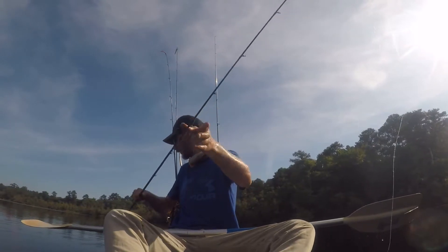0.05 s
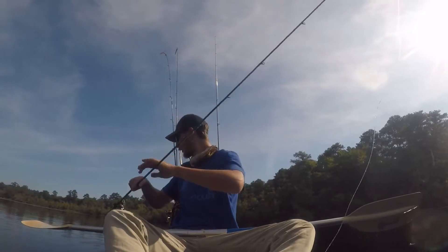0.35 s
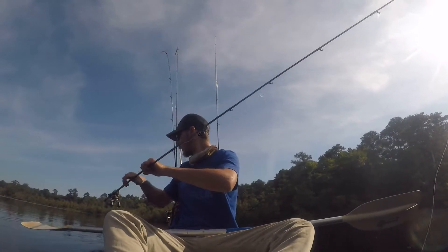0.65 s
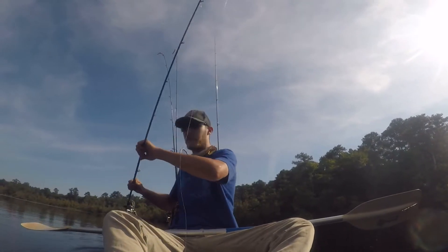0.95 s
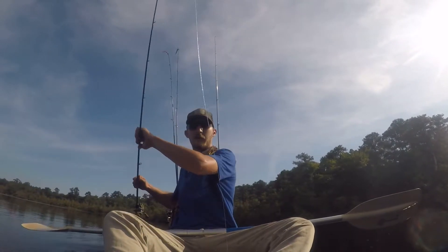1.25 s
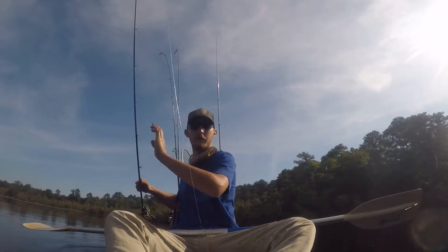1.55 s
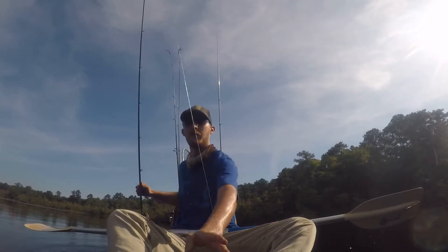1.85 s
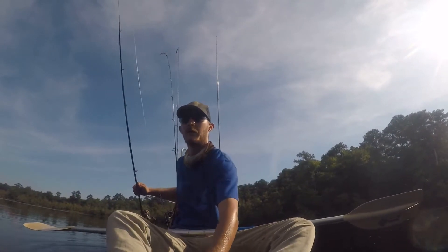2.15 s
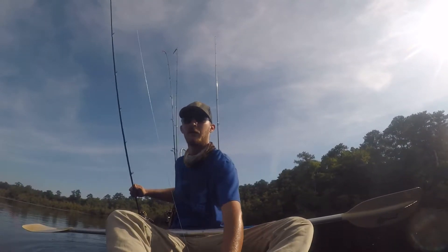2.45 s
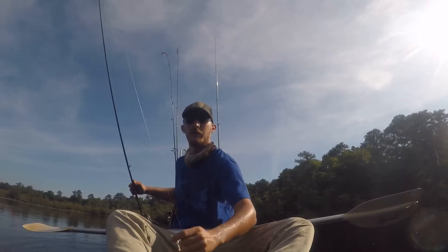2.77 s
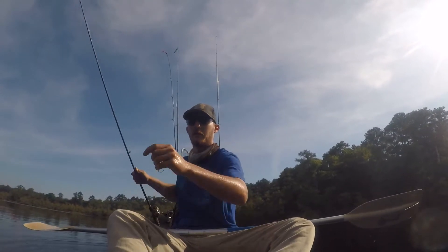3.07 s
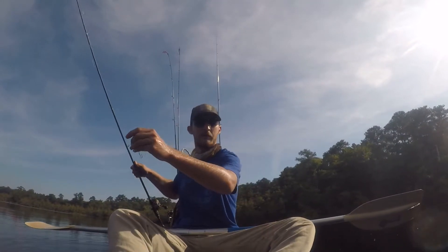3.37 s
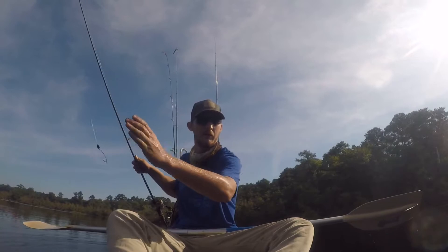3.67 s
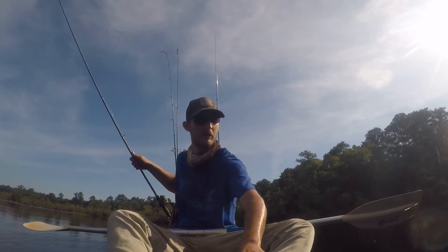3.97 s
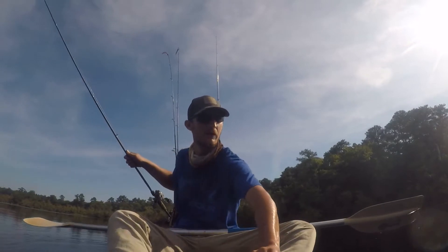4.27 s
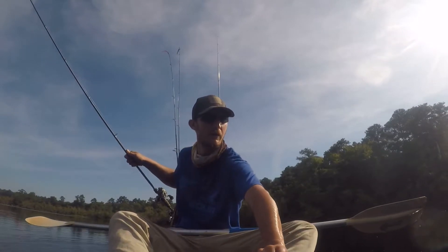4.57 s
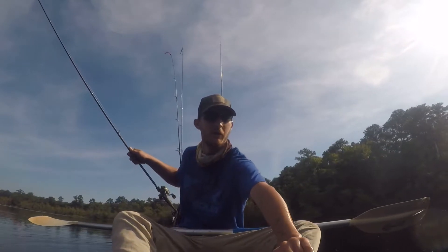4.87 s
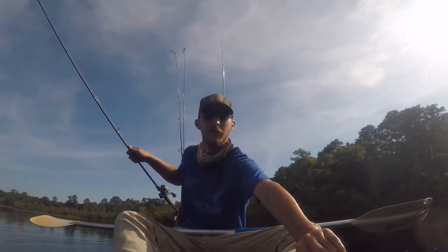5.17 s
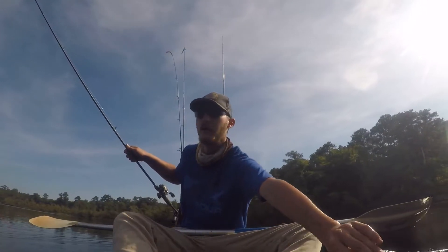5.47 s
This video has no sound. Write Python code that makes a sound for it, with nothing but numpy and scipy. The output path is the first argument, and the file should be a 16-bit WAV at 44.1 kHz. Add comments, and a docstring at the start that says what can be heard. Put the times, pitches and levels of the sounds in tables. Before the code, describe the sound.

Hollow knocks, rubbing and low thumps on a plastic kayak as fishing tackle is handled, over a faint pond hiss.

```python
"""Hollow knocks, rubbing and groans of a plastic kayak as an angler shifts about and handles rod and tackle.
Blows and stick-slip drive the hull's modes, which radiate into the air and shake the two microphones of
a camera fixed to the boat against each other. Weight shifts rock the boat; a sleeve brushes the rod.
Behind lie a calm pond's breeze rumble, soft hiss, thin insect band, small drips and faint chirps.
The camera's limiter ducks everything under the heaviest blows."""
import sys
import numpy as np
from scipy import signal
from scipy.fft import rfft, irfft
from scipy.io import wavfile
from scipy.ndimage import uniform_filter1d, minimum_filter1d

SR = 44100
rng = np.random.default_rng(int(sys.argv[2]) if len(sys.argv) > 2 else 0)


def bounce(signal):
    """Save signal as a 16-bit WAV file at the path given by the first command-line argument."""
    frames = np.transpose(np.atleast_2d(signal))
    limited = np.clip(frames, -1, 1)
    pcm = np.round(limited * 32767).astype(np.int16)
    wavfile.write(sys.argv[1], SR, pcm)


N = 248072
TIME = np.arange(N) / SR


def undb(db):
    """Decibels to gain."""
    return 10 ** (np.asarray(db) / 20)


def curve(table):
    """Linear interpolation of (time, value) rows."""
    return np.interp(TIME, *np.transpose(table))


def unit(x):
    """Scale to rms 1."""
    return x / np.sqrt(np.mean(x ** 2))


def running_rms(x, size):
    """Rms over a window of size samples."""
    return np.sqrt(np.abs(uniform_filter1d(x ** 2, size)) + 1e-18)


def band(x, lo_hz, hi_hz, order=2):
    """Butterworth band-pass."""
    return signal.sosfilt(signal.butter(order, [lo_hz, hi_hz], "band", fs=SR, output="sos"), x)


def walk(rate_hz):
    """Smooth random drift, rms 1."""
    size = int(SR / rate_hz)
    steps = np.repeat(rng.standard_normal(N // size + 1), size)
    return unit(uniform_filter1d(steps, size)[:N])


def impulses(per_s, spread_db, cap_spreads):
    """Random impulses of uneven size."""
    train = (rng.random(N) < per_s / SR) * rng.standard_normal(N)
    return train * undb(spread_db * np.minimum(rng.exponential(size=N), cap_spreads))


def ring(x, modes):
    """Drive parallel damped modes."""
    return sum(undb(db) * signal.lfilter(*signal.iirpeak(hz, hz / width_hz, fs=SR), x)
               for hz, width_hz, db in modes)


def add(out, start_s, x):
    """Mix x into out from start_s on."""
    start = max(int(start_s * SR), 0)
    out[start:start + len(x)] += x[:N - start]


def gesture(events, attack_s, release_s):
    """Envelope of movements that rise, hold and decay, summed in power."""
    power = np.zeros(N)
    for start_s, length_s, db in events:
        first = max(int(start_s * SR), 0)
        t = TIME[first:first + SR] - start_s
        rise = np.clip(t / attack_s, 0, 1)
        decay = np.exp(-np.maximum(t - length_s, 0) / release_s)
        power[first:first + SR] += (undb(db) * rise * decay) ** 2
    return np.sqrt(power)


def whistles(events, waver):
    """Thin, unsteady gliding tones that start abruptly, swell and fade."""
    out, unsteady = np.zeros(N), 1 + waver * walk(900)
    for start_s, start_hz, end_hz, length_s, db in events:
        count = int(length_s * SR)
        hz = np.geomspace(start_hz, end_hz, count) * np.roll(unsteady, -int(start_s * SR))[:count]
        swell = np.interp(np.linspace(0, 1, count), [0, 0.2, 0.6, 1], [0.44, 0.66, 0.75, 0.27])
        add(out, start_s, undb(db) * swell * np.sin(2 * np.pi * np.cumsum(hz) / SR))
    return out


def shake(x, pan_db, lag_s):
    """Vibration pushes the two microphones in opposite directions, the right one later."""
    return np.array([x * undb(pan_db / 2), -np.interp(TIME - lag_s, TIME, x) * undb(-pan_db / 2)])


def pond():
    """Open-air hiss, wider in the treble, with distant insects and the rumble of a light breeze."""
    # open-air spectrum: (frequency [Hz], relative density [dB])
    spectrum = [(25, -27), (70, -19), (102, -25), (120, 5), (150, -9.5), (300, -14.5), (500, -23),
                (1000, -31), (2000, -36), (4000, -42), (6000, -41), (10000, -43), (12000, -49.5),
                (15000, -58.5)]
    # envelopes, each: (time [s], level [dB])
    hiss_levels = [(0, -43), (.6, -44), (2.2, -43.5), (3.8, -43), (5.6, -40.5)]
    insect_levels = [(0, -60.5), (1.0, -66), (1.6, -101), (5.63, -64.5)]
    breeze_levels = [(0, -27.5), (.15, -37), (1.15, -42), (1.5, -51), (2.2, -55), (2.8, -43.5),
                     (4.7, -38.5), (5.6, -38.5)]
    hz = np.maximum(np.arange(N // 2 + 1) * SR / N, 1)
    points_hz, points_db = np.transpose(spectrum)
    colour = undb(np.interp(np.log(hz), np.log(points_hz), points_db))
    mid, side = (rfft(rng.standard_normal(N)) * colour for _ in range(2))
    width = 0.012 + 0.82 * hz ** 2 / (hz ** 2 + 2800 ** 2)
    air = unit(np.array([irfft(mid + width * side, N), irfft(mid - width * side, N)]))
    buzz = band(rng.standard_normal(N), 2282, 2512)
    insects = buzz / running_rms(buzz, 1500) * undb(curve(insect_levels) + 2.0 * walk(42))
    breeze = unit(band(rng.standard_normal(N), 32.3, 99)) * undb(curve(breeze_levels))
    return air * undb(curve(hiss_levels) + 0.83 * walk(7.7)) + insects + breeze


def chirps():
    """Far-off, mostly falling calls from one side, with an echo off the wooded shore."""
    # calls: (time [s], start pitch [Hz], end pitch [Hz], length [s], level [dB])
    glides = [(0.42, 2580, 2750, .05, -66), (.572, 2730, 2620, 0.039, -61.5),
              (0.939, 4620, 3800, 0.03, -57.5), (1.062, 4750, 3970, .034, -61),
              (1.185, 4700, 3800, 0.032, -62), (2.44, 4500, 3600, 0.045, -62),
              (2.548, 4670, 3650, .046, -68), (2.672, 4500, 3700, 0.042, -67),
              (3.663, 4400, 3520, 0.04, -61), (3.805, 4300, 3300, 0.028, -61),
              (4.685, 2040, 1420, 0.077, -58), (4.805, 4730, 3450, 0.046, -58.5),
              (4.927, 4820, 3150, 0.043, -52.5), (5.045, 4800, 4050, 0.023, -52),
              (5.525, 2130, 1400, 0.099, -54.5)]
    flutter_db, shore_decay_s, lag_s = 4, 0.025, 0.00005
    calls = whistles(glides, waver=0.012) * undb(flutter_db * walk(220))
    shore = rng.standard_normal(8192) * np.exp(-TIME[:8192] / shore_decay_s)
    direct = np.array([calls, np.interp(TIME - lag_s, TIME, calls)])
    echo = signal.fftconvolve(calls, shore / np.linalg.norm(shore))[:N]
    return undb(0.5) * direct + undb(-2.5) * echo


def drips():
    """Each drop beside the boat leaves a small bubble that rises in pitch."""
    # bubbles: (time [s], start pitch [Hz], length [s], level [dB])
    bubbles = [(.044, 1410, 0.021, -61), (0.06, 1810, 0.015, -49), (.093, 1670, 0.014, -55),
               (0.145, 1270, 0.0092, -43.5), (.155, 4000, .006, -52), (.187, 4430, 0.0073, -53),
               (.271, 5230, 0.0051, -49), (.351, 5200, .004, -53), (.396, 7400, .006, -53),
               (0.407, 1060, .012, -50), (0.551, 5000, 0.0046, -50.5), (0.558, 970, .012, -58),
               (0.67, 5200, 0.0046, -52)]
    glides = [(start_s, hz, hz * 1.055, length_s, db) for start_s, hz, length_s, db in bubbles]
    return whistles(glides, waver=0.041)


def sleeve():
    """Cloth and skin rub dully and crackle in fine grains, heard through the air."""
    # strokes along the rod: (time [s], length [s], dull rub [dB], crackle [dB])
    brushes = [(-.02, 0.062, -51, -52), (0.862, 0.045, -38.5, -57.5), (1.046, 0.028, -39.5, -53.5),
               (1.128, 0.063, -46, -61.5), (5.015, 0.18, -39, -54.5)]
    grains = impulses(per_s=2500, spread_db=3.7, cap_spreads=4)
    rub = band(grains, 216, 525)
    crackle = band(grains, 1220, 1940) + undb(-13.5) * band(grains, 3300, 6900)
    out = np.zeros(N)
    for k, part in enumerate([rub, crackle]):
        strokes = [(start_s, length_s, dbs[k]) for start_s, length_s, *dbs in brushes]
        out += unit(part) * gesture(strokes, attack_s=0.0077, release_s=0.06)
    return out


def wobble():
    """Weight shifts stir the boat's lowest mode, which sways the camera and pushes water aside."""
    # weight shifts: (time [s], level [dB])
    shifts = [(2.24, -37), (2.44, -35), (2.749, -18.5), (2.879, -18.5), (3.25, -35), (3.415, -17.5),
              (3.67, -28), (3.946, -9.5), (4.087, -10), (4.269, -22), (4.469, -14.5), (4.811, -11),
              (4.975, -3), (5.111, -8), (5.191, -9)]
    mode_hz, hold_s, rest_db, slosh_db = 47.43, 0.024, -35.5, -14
    stir = gesture([(start_s, hold_s, db) for start_s, db in shifts], attack_s=0.021, release_s=0.11)
    hz = mode_hz * (1 + 0.154 * walk(35))
    rocking = np.sin(2 * np.pi * np.cumsum(hz) / SR) * undb(2.15 * walk(28))
    rest = undb(rest_db) * np.clip((TIME - shifts[0][0]) / 0.18, 0, 1)  # persists once stirred
    sway = unit(band(rocking, 30.3, 66.7)) * np.hypot(stir, rest)
    slosh = unit(band(rng.standard_normal(N), 31.5, 69)) * stir * undb(slosh_db)
    return shake(sway, pan_db=-4.5, lag_s=0.003) + slosh


def leans():
    """The broad deck judders in its low modes under the weight of an arm."""
    # arm loads: (time [s], length [s], level [dB])
    loads = [(2.425, 0.054, -43), (2.76, 0.14, -33), (3.42, 0.071, -31), (4.47, 0.071, -23),
             (4.812, 0.212, -16.5)]
    # deck resonances: (frequency [Hz], width [Hz], relative gain [dB])
    deck_modes = [(82, 3.9, 9.5), (99, 12, -5), (119.2, 12, -3)]
    judder = band(ring(rng.standard_normal(N), deck_modes), 87, 144.4, order=3)
    return judder / running_rms(judder, 1800) * gesture(loads, attack_s=0.043, release_s=0.033)


def rasps():
    """Line, fingers or forearm drag over the boat; friction makes one narrow resonance sing."""
    # drags: (time [s], length [s], pitch [Hz], level [dB])
    drags = [(0.906, 0.013, 2260, -41.5), (1.117, 0.054, 1430, -54), (2.374, 0.024, 3150, -43),
             (2.397, 0.025, 2400, -31), (2.426, 0.022, 2440, -34), (2.497, 0.019, 3140, -46),
             (4.027, 0.13, 880, -46.5), (4.088, .055, 2330, -55), (4.207, 0.041, 2200, -56),
             (4.28, 0.033, 2400, -55), (4.449, 0.069, 1990, -55), (4.463, 0.076, 1460, -61),
             (4.805, 0.24, 864, -33), (4.815, 0.12, 2210, -47), (4.99, 0.025, 2350, -37),
             (5.009, 0.17, 2330, -42), (5.001, 0.18, 1480, -44.5), (5.019, 0.2, 3150, -52.5),
             (5.03, 0.11, 4200, -56), (5.157, 0.08, 900, -29), (5.249, 0.024, 2300, -33)]
    half_width, settle_samples = 0.082, 8192
    out = np.zeros(N)
    for start_s, length_s, hz, db in drags:
        count = int(length_s * SR)
        friction = rng.standard_normal(settle_samples + count)
        singing = band(friction, hz * (1 - half_width), hz * (1 + half_width))[settle_samples:]
        add(out, start_s, undb(db) * np.hanning(count) * unit(singing))
    return out


def hull(force):
    """Response in three registers: slow flexing, plastic walls, stiff fittings."""
    # resonances, each: (frequency [Hz], width [Hz], relative gain [dB])
    flex_modes = [(153.8, 13, 11), (176, 13.1, 18), (196, 112, -0.5), (269.3, 5.9, 0), (306, 45, 3.5)]
    wall_modes = [(505, 100, 9.3), (610, 70, 15.3), (688, 41, 18), (761, 88, 4.2), (820, 62, 13.6),
                  (904, 96, 6.7), (1060, 26, 1)]
    fitting_modes = [(1218, 42, 25.5), (1300, 165, 22.5), (1410, 40, 11), (1450, 50, 5.5), (1827, 53, 16),
                     (1900, 33, 7.5), (2217, 97, 20), (2400, 50, 5), (2765, 60, -0.5), (2890, 150, -5)]
    return [band(ring(force, flex_modes), 133, 314),
            band(ring(force, wall_modes), 422, 923, order=3),
            band(ring(force, fitting_modes), 760, 2037, order=3)]


def radiation(flex, wall, fittings, rasp):
    """Airborne sound: the hollow hull booms softly, and its small, stiff parts radiate best."""
    # radiating resonances: (frequency [Hz], width [Hz], gain [dB])
    air_modes = [(296, 8.8, 3.5), (342, 25, -4.5), (438, 15, -3), (537.4, 7.1, -1.5), (796, 26, -3),
                 (888.5, 16.7, 0.5), (919.4, 20, -5), (1002, 19, -6.5), (1118, 12, 4.5), (1297, 26, -0.5),
                 (1378, 150, 3.5), (1551, 180, 4), (1958, 40, 2), (2060, 40, -6), (2350, 330, -7.5),
                 (2580, 59, -10), (3515, 1330, -5.5)]
    boom = undb(-5.5) * band(flex, 1.2, 299)
    drive = (undb(-16.5) * band(flex, 180, 420) + undb(-11.5) * wall
             + undb(-17) * fittings + undb(4) * band(fittings, 3000, 6850) + rasp)
    return boom + ring(drive, air_modes)


def rubbing():
    """Dense tiny slips drive the hull as the grip catches and lets go: flex, wall, fittings, hiss."""
    # hand, sleeve and seat slides: (time [s], length [s], flex [dB], wall [dB], fittings [dB])
    slides = [(0.88, 0.031, -34, -41, -49), (1.041, 0.039, -32, -38, -52), (1.111, 0.034, -38, -40, -38),
              (1.584, 0.23, -31.5, -46.5, -56), (2.078, 0.13, -36, -47, -71), (2.257, .03, -26, -36, -43),
              (2.291, 0.083, -25, -18.5, -21.5), (2.373, 0.049, -29, -32, -22.5),
              (2.508, 0.03, -26, -45, -69), (2.718, 0.066, -22.5, -55.5, -65),
              (2.944, 0.095, -35, -60, -74), (3.251, 0.045, -26.5, -41, -52),
              (3.384, 0.13, -26.5, -42, -51), (3.538, 0.797, -31.5, -47, -54),
              (4.018, 0.1, -23.5, -35.5, -49), (4.186, 0.068, -27.5, -42.5, -53),
              (4.435, 0.073, -21, -33, -47), (4.816, 0.14, -11.5, -26.5, -36),
              (4.995, 0.21, -19.5, -25, -26.5), (5.209, 0.082, -18.5, -26, -32)]
    # soft creak under the angler's weight: (time [s], level [dB])
    creak_levels = [(0, -100), (.8, -37), (1.25, -35.5), (1.5, -33.5), (2.6, -27), (3.9, -36), (4.7, -31.5),
                    (5.6, -30.5)]
    # creak offset per register: (flex [dB], wall [dB], fittings [dB])
    creak_offsets_db = [-9, -22, -24.5]
    slips = impulses(per_s=6000, spread_db=1.5, cap_spreads=5)
    grip = undb(1.85 * walk(46))
    levels = []
    for k, offset_db in enumerate(creak_offsets_db):
        strokes = [(start_s, length_s, dbs[k]) for start_s, length_s, *dbs in slides]
        sliding = gesture(strokes, attack_s=0.022, release_s=0.034)
        levels.append(grip * np.hypot(sliding, undb(curve(creak_levels) + offset_db)))
    parts = [part / running_rms(part, 1500) * level for part, level in zip(hull(slips), levels)]
    hiss = unit(band(slips, 2740, 4020)) * levels[-1] * undb(-34.5)
    return np.array(parts + [hiss])


def groans():
    """Stick-slip on the plastic locks on to the flexing hull for a short run of uneven cycles."""
    # slips: (time [s], length [s], pitch [Hz], level [dB])
    slips = [(0.874, 0.016, 315, -20), (1.172, 0.023, 185, -16), (1.575, 0.022, 183, -12),
             (1.77, 0.066, 176, -25), (1.954, 0.038, 177, -16), (2.291, 0.079, 196, -10.5),
             (2.292, 0.033, 298, -11), (2.338, 0.048, 205, -13), (2.446, 0.0078, 222, -19),
             (3.95, 0.035, 168, -3), (3.99, 0.053, 175, -15), (4.055, 0.054, 173.4, -14),
             (4.49, 0.067, 148.2, -10.5), (4.814, 0.013, 149, -9), (4.825, 0.19, 178.1, -9.5),
             (4.975, 0.066, 172.6, -4.5)]
    rise_share = 0.37
    out, waver = np.zeros(N), 1 + 0.068 * walk(90)
    for start_s, length_s, hz, db in slips:
        t = TIME[:int(length_s * SR)]
        phase = 2 * np.pi * np.cumsum(hz * waver[int(start_s * SR):][:len(t)]) / SR
        swell = np.sin(np.interp(t / length_s, [0, rise_share, 1], [0, np.pi / 2, np.pi])) ** 1.87
        add(out, start_s, np.sqrt(2) * undb(db) * swell * (np.sin(phase) + 0.08 * np.sin(2 * phase)))
    return out


def disperse(x, scale_s):
    """Bending-wave speed grows as the root of frequency, so the lows of a blow arrive late."""
    hz = np.arange(len(x) // 2 + 1) * SR / len(x)
    turns = scale_s * (2 * np.sqrt(1000 * hz) - 0.55 * hz)
    return irfft(rfft(x) * np.exp(-2j * np.pi * turns), len(x))


def ping(t):
    """Free ring of a struck fitting; mode levels and pitches vary per blow."""
    # clearest modes: (frequency [Hz], t60 [s], level relative to the blow [dB])
    modes = [(838, 0.15, -17.5), (1333, 0.05, 2.5), (1553, 0.047, -0.5), (1886, 0.034, -13),
             (2184, 0.023, -2), (2644, 0.034, -12)]
    out = np.zeros(len(t))
    for hz, t60_s, db in modes:
        size, detune = rng.standard_normal(2)
        tone = np.sin(2 * np.pi * hz * (1 + 0.024 * detune) * t)
        out += undb(db + 4.4 * size) * tone * np.exp(-np.log(1000) * t / t60_s)
    return out * (1 - np.exp(-t / 0.0019))


def knocks():
    """A push, then brief chatter: hull and hollow cockpit answer, the contact ticks, a fitting rings."""
    # blows: (time [s], flex [dB], wall [dB], fittings [dB], ping [dB], tick [dB])
    blows = [(0.877, -32, -27.5, -41, -45, -75), (0.908, -29.5, -27, -29, -37, -54),
             (0.932, -38, -39, -39, -46, -73), (1.058, -27.5, -31, -28, -36, -58),
             (1.072, -39, -34, -33, -51, -70), (1.146, -35, -34.5, -39, -46, -68),
             (1.165, -31, -34, -33, -48, -70), (1.185, -25, -40, -34, -41, -65),
             (1.848, -24.5, -28.5, -41, -43, -68), (1.9, -40, -30.5, -29.5, -38, -50),
             (1.918, -28.5, -32, -38, -39, -52), (2.086, -28.5, -39, -31.5, -50, -68),
             (2.109, -41, -37, -39, -48, -70), (2.151, -27.5, -34, -33.5, -46, -77),
             (2.229, -18.5, -27.5, -38, -37, -62), (2.288, -6, -5, -5, -13.5, -33.5),
             (2.291, -7, -13, -20, -29, -55), (2.307, -8, -15, -16, -24, -56),
             (2.33, -12, -4, -5, -5.5, -43), (2.334, -19, -4.5, -6, -22, -58),
             (2.347, -20, -5.5, -12, -18, -60), (2.354, -21, -14.5, -15, -13.5, -62),
             (2.378, -43, -31, -28, -22.5, -40), (2.401, -25.5, -23, -34, -32, -36),
             (2.411, -38, -17, -25, -27, -46), (2.428, -40, -30.5, -36, -31, -58),
             (2.442, -21.5, -22, -25, -29, -57), (2.495, -60, -33.5, -33.5, -25.5, -50),
             (2.506, -46, -34, -21, -31.5, -52), (2.752, -15, -21.5, -23.5, -36, -57),
             (2.879, -16, -22, -29.5, -47, -52.5), (3.26, -17.5, -21.5, -25, -37, -56),
             (3.416, -16.5, -20.5, -33, -42, -59), (3.672, -35, -33, -38, -46, -59),
             (3.77, -38, -35, -58, -61, -70), (3.855, -28, -31, -51, -61, -73),
             (3.946, -13, -22, -52, -53, -73), (4.161, -25, -30.5, -45, -49, -64),
             (4.293, -34, -43, -41, -51, -66), (4.346, -40, -53, -40, -49, -76),
             (4.818, -24, -27, -44, -46, -62), (4.947, -13, -21.5, -39, -38, -66),
             (4.974, -5, -14.5, -44, -45.5, -65), (4.996, -3.5, -11.5, -37, -34, -60),
             (5.183, -21, -24, -35, -38, -68.5), (5.197, -12.5, -14.5, -26, -30.5, -54),
             (5.317, -25.5, -29, -33, -41, -70)]
    push_db, chatter_s, cockpit_db = 21.5, 0.0059, -3.5
    tracks, pings, t = np.zeros((4, N)), np.zeros(N), TIME[:8192]
    push = t == 0
    damping = np.exp(-t / 0.17)  # hands and knees rest on the boat
    for start_s, flex_db, wall_db, fittings_db, ping_db, tick_db in blows:
        chatter = rng.standard_normal(len(t)) * (np.exp(-t / chatter_s) + 0.058 * np.exp(-t / 0.023))
        force = disperse(band(undb(push_db) * push + chatter, 305, 12000), scale_s=0.001807)
        contact = (chatter + 3 * push) * np.exp(-t / 0.00405)
        tick = band(contact, 3850, 6850, order=4) + undb(8) * band(contact, 2710, 3380)
        parts = [part * damping for part in hull(force)] + [tick]
        for track, part, db in zip(tracks, parts, [flex_db, wall_db, fittings_db, tick_db]):
            add(track, start_s, part * undb(db) / running_rms(part, 220).max())
        add(pings, start_s, ping(t) * undb(ping_db))
        cockpit = band(force, 275, 350) * damping
        add(tracks[1], start_s, cockpit * undb(wall_db + cockpit_db) / running_rms(cockpit, 220).max())
    return tracks, pings


def scene():
    """The hull shakes the camera mount and also sounds through the air, over the pond."""
    blows, pings = knocks()
    flex, wall, fittings, tick = blows + rubbing()
    flex = flex + groans() + leans()
    rasp = rasps()
    mount = (shake(flex, pan_db=3.5, lag_s=0.0001)
             + shake(wall, pan_db=1.19, lag_s=0.00002)
             + shake(fittings + rasp, pan_db=1, lag_s=0.00002)
             + shake(tick, pan_db=-10, lag_s=0.00008)
             + shake(pings, pan_db=-1.3, lag_s=0.00013))
    boat = mount + wobble() + radiation(flex, wall, fittings, rasp)
    return boat + sleeve() + drips() + chirps() + pond()


def duck(x, limit_db, share, release_db_per_s):
    """Gain reduction [dB]: a share of each peak's excess over the limit, released at a steady rate."""
    peak_db = 20 * np.log10(np.abs(x).max(axis=0) + 1e-9)
    cut_db = np.maximum(peak_db - limit_db, 0) * share
    release_db = release_db_per_s * TIME
    return np.maximum.accumulate(cut_db + release_db) - release_db


def record(dry):
    """Camera: quick treble-weighted limiter, slow bass-driven gain control, steep low-pass."""
    treble_db, top_hz = 7.5, 14700
    bright = dry + undb(treble_db) * band(dry, 830, 11000, order=1)
    quick_db = duck(bright, limit_db=0, share=0.65, release_db_per_s=74)
    slow_db = duck(band(dry, 29, 181), limit_db=-6.5, share=0.67, release_db_per_s=4)
    gain = undb(-np.maximum(quick_db, slow_db))
    gain = uniform_filter1d(minimum_filter1d(gain, size=200), size=200)
    return signal.sosfilt(signal.ellip(8, 0.2, 70, top_hz, fs=SR, output="sos"), dry * gain)


dry = scene()
out = record(dry)
bounce(out)
```